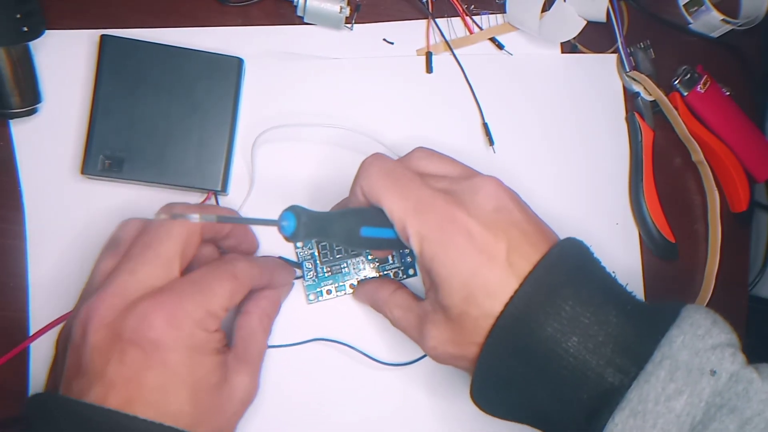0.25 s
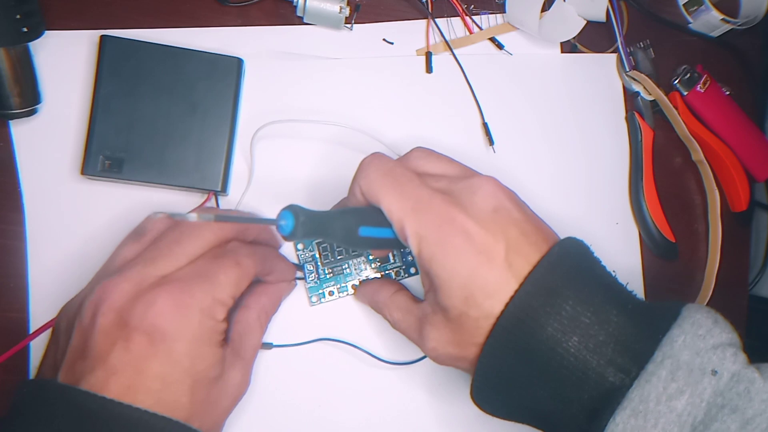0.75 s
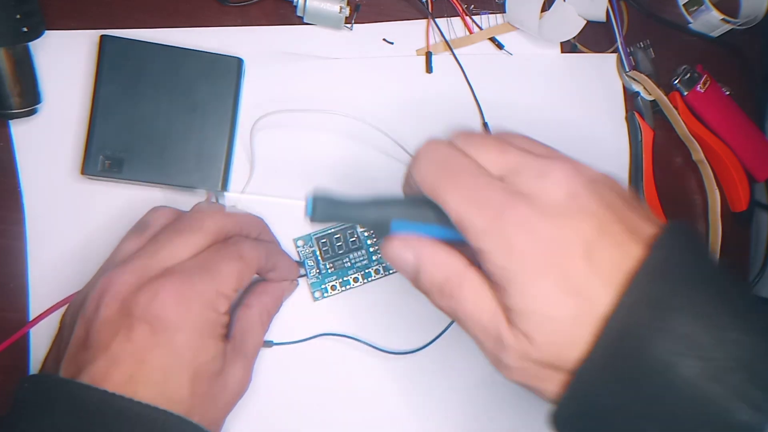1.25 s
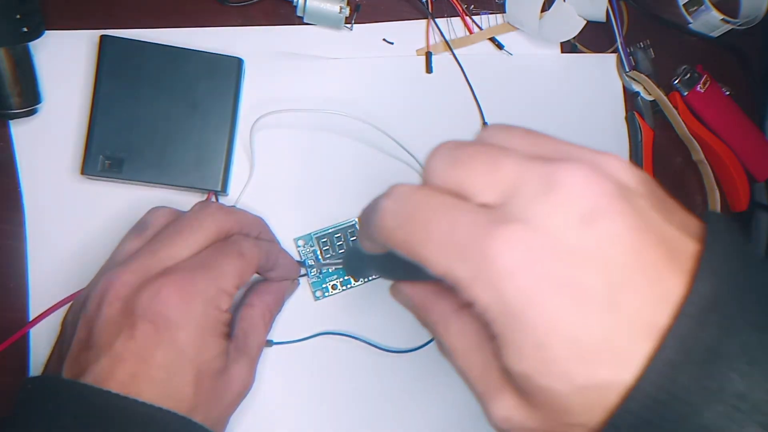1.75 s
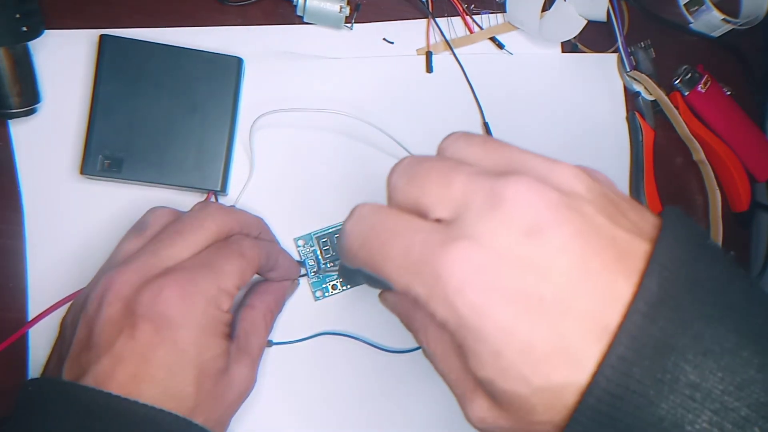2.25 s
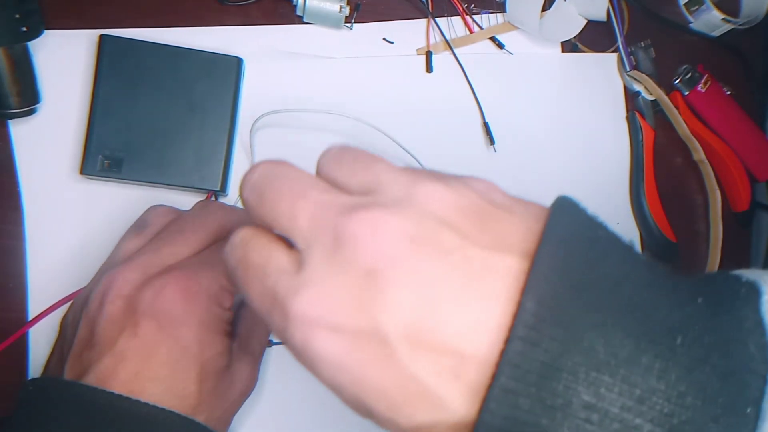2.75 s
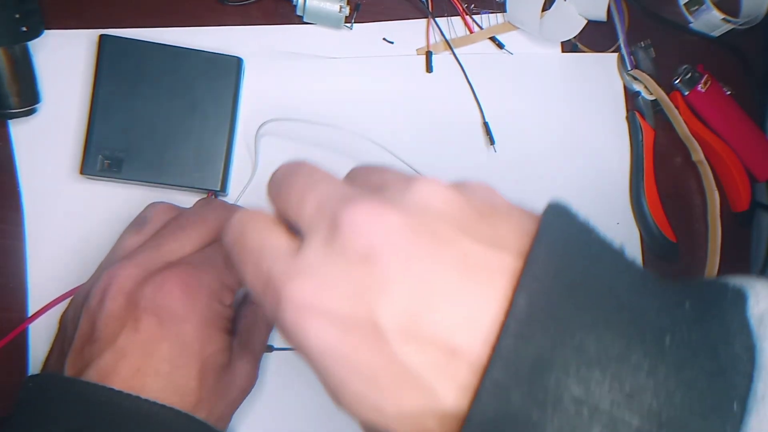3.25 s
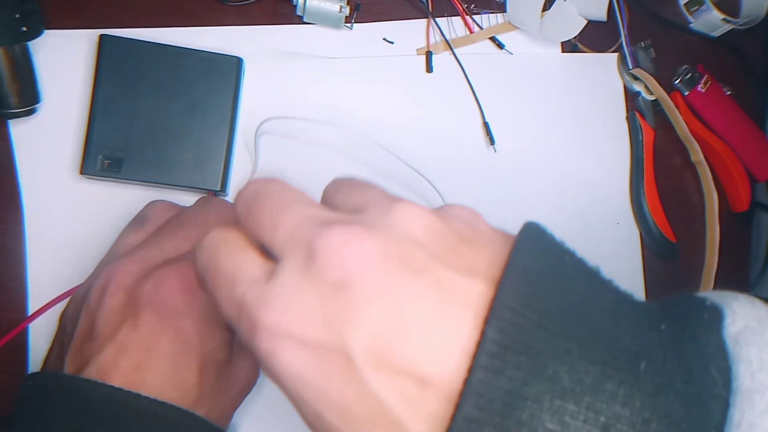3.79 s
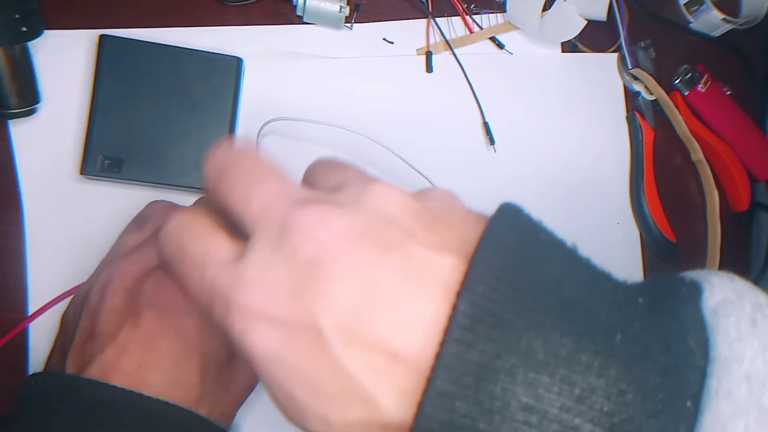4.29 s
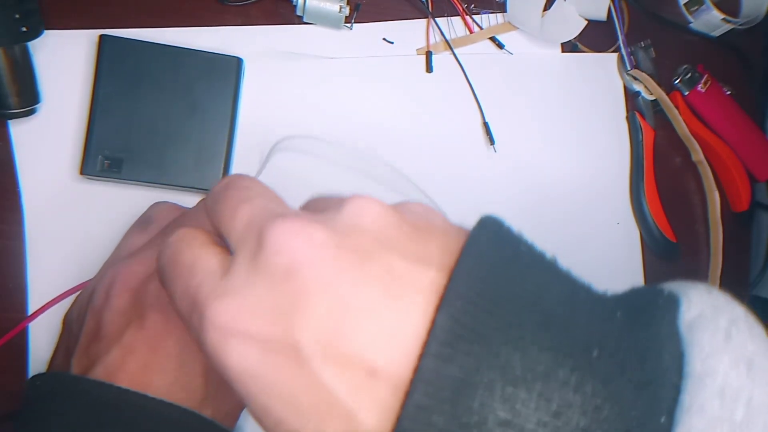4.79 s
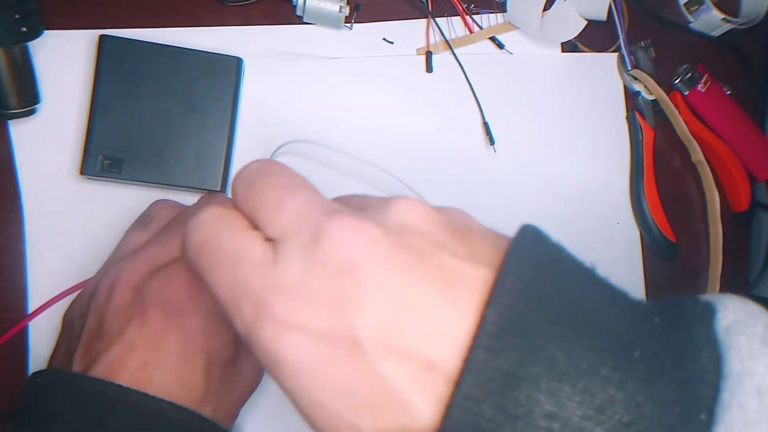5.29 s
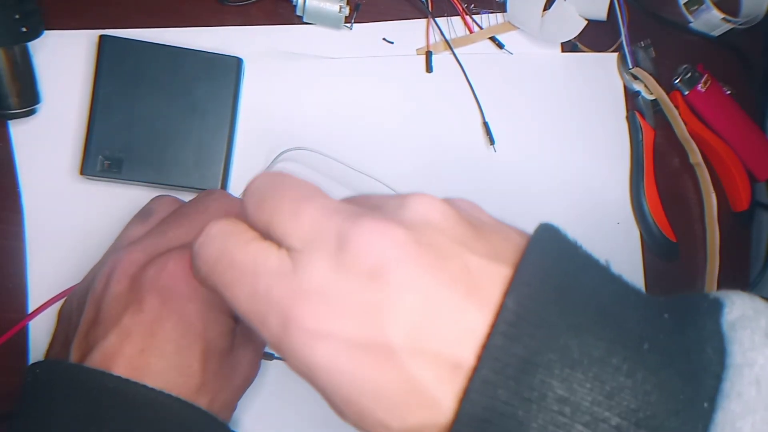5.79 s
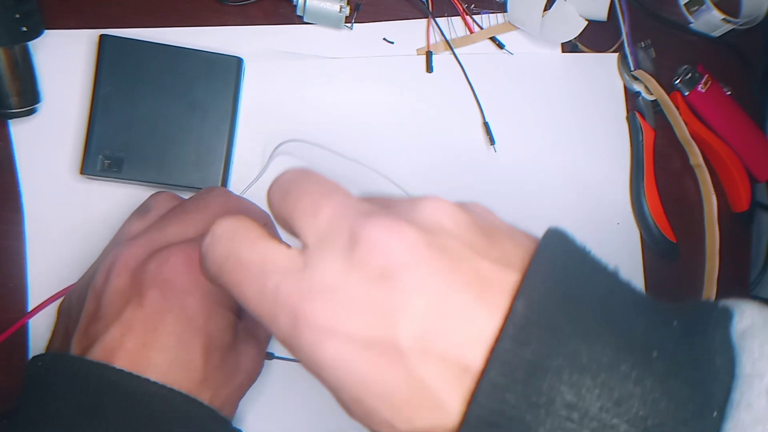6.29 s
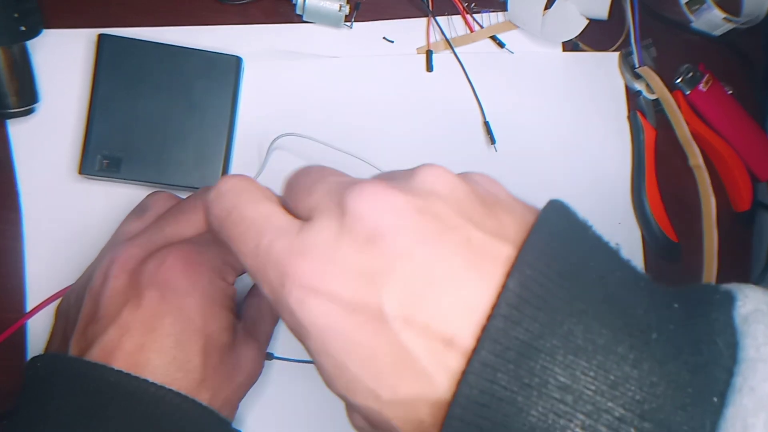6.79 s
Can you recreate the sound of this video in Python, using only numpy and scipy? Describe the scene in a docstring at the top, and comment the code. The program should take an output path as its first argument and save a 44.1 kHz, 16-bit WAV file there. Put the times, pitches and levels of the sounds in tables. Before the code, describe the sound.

Sparse light ticks and scrapes of a screwdriver on screw terminals, with a few sharper knocks on the desk and a faint fan hum.

```python
"""Screwdriver on a circuit board

A small screwdriver works the screw terminals of a little board lying on paper on a desk. The blade
ticks and scrapes, and when it slips the board knocks on the desk top; a small room answers each contact.
Hands rustle, faint tones flicker, thin whistles come and go, and a fan beats against mains hum."""
import sys
import numpy as np
from scipy import signal
from scipy.fft import rfft, irfft
from scipy.io import wavfile

SR = 44100
rng = np.random.default_rng(int(sys.argv[2]) if len(sys.argv) > 2 else 0)


def to_wav(sig):
    """Store sig (one row per channel, or 1-D mono) as 16-bit WAV at the path in sys.argv[1].

    Samples outside -1..1 are clipped; the rate is SR.
    """
    pcm = np.clip(np.atleast_2d(sig), -1, 1) * 32767
    pcm = np.round(pcm).astype(np.int16)
    wavfile.write(sys.argv[1], SR, pcm.T)  # frames by channels


N = 310464
TIME = np.arange(N) / SR
RING_SAMPLES = int(.2 * SR)


def undb(db):
    """Decibels to gain."""
    return 10 ** (np.asarray(db) / 20)


def level(x, db):
    """Scale to an rms level."""
    return x * undb(db) / np.sqrt(np.mean(x ** 2))


def unit_hit(x):
    """Scale a short sound to the energy of 20 ms at full level."""
    return x * np.sqrt(.02 * SR / np.sum(x ** 2))


def colour(x, curve):
    """Shape a sound with an EQ curve of (Hz, dB) points."""
    hz, db = np.transpose(curve)
    bins_hz = np.maximum(np.fft.rfftfreq(len(x), 1 / SR), 1)
    return irfft(rfft(x) * undb(np.interp(np.log(bins_hz), np.log(hz), db)), len(x))


def wander(rate):
    """A random control that glides to `rate` new values a second, with a spread near 1."""
    points = rng.standard_normal(int(N / SR * rate) + 2)
    return np.interp(TIME * rate, np.arange(len(points)), points)


def add(track, start_s, x):
    """Mix a sound into the track."""
    i = max(int(start_s * SR), 0)
    track[i:i + len(x)] += x[:max(N - i, 0)]


# The colour of the hiss. Each row: frequency in Hz, gain in dB.
HISS_EQ = [(100, -9), (4000, -2), (8000, -16), (11000, -8.5), (15500, -4)]
def microphone_hiss():
    """A faint, steady noise floor."""
    return level(colour(rng.standard_normal(N), HISS_EQ), -76.5)


# Tones of the fan blades and the mains. Each row: frequency in Hz, relative level in dB.
HUM_TONES = [(120, -92), (185.5, -86), (240, -80), (360, -65.5), (371, -60), (480, -84)]
# The colour of the air the fan moves. Each row: frequency in Hz, gain in dB.
AIR_EQ = [(60, -30.5), (120, -25.5), (175, -22.5), (250, -9), (325, 1.5), (380, -0.5), (420, -0.5),
          (470, -3), (505, -18), (550, -12), (680, -24.5), (1150, -23), (3000, -37.5), (7000, -44.5)]
def fan(tone_db=-1, air_db=-65, waver_db=1.06, swirl_db=3.5, flutter_db=2.5):
    """The blade tone beats with a mains harmonic 11 Hz below it, over a soft rush of air."""
    tones = np.zeros(N)
    for hz, db in HUM_TONES:
        phase = 2 * np.pi * (hz * TIME + rng.random()) + .25 * wander(3)
        gain = undb(db + waver_db * wander(1.9) + flutter_db * wander(24))
        tones += np.sqrt(2) * gain * np.sin(phase)
    air = level(colour(rng.standard_normal(N), AIR_EQ), air_db) * undb(swirl_db * wander(5))
    return undb(tone_db) * tones + air


# Echoes off near surfaces. Each row: delay in seconds, gain in dB.
EARLY_ECHOES = [(.0029, -18), (.0076, -18), (0.0127, -20.5)]
# The room's tail. Each row: band centre in Hz, relative level in dB, seconds to fall 60 dB.
TAIL_BANDS = [(125, -9.5, 0.27), (400, -14.5, 0.37), (900, -16.5, 0.23), (1940, -13, 0.21),
              (5000, -15.5, 0.17), (8000, -13.5, .22), (14000, -19.5, .16)]
def room(x, gap_s=.006, build_s=.016):
    """Add a few near reflections, then a short diffuse tail that loses its treble first."""
    n = SR // 2
    t = np.arange(n) / SR
    hz, db, t60 = np.transpose(TAIL_BANDS)
    log_hz = np.log(np.maximum(np.fft.rfftfreq(n, 1 / SR), 1))
    noise, response = rfft(rng.standard_normal(n)), np.zeros(n)
    for share, band_db, band_t60 in zip(np.eye(len(TAIL_BANDS)), db, t60):
        band = irfft(noise * np.interp(log_hz, np.log(hz), share), n)
        fade = np.clip((t - gap_s) / build_s, 0, 1) * np.exp(-np.log(1000) * t / band_t60)
        response += band * undb(band_db) * fade / np.sqrt(np.sum(fade ** 2))
    for delay, echo_db in EARLY_ECHOES:
        response[int(delay * SR)] += undb(echo_db)
    return x + signal.fftconvolve(x, response)[:N]


# Hands and sleeve shifting on the paper. Each row: time in seconds, relative level in dB.
HAND_MOVES = [(0.0, -71), (0.25, -70), (0.43, -74.5), (2.0, -75), (2.51, -76), (2.78, -71.5), (3.69, -72),
              (4.24, -75.5), (4.61, -75), (5.02, -75), (5.67, -74), (6.27, -67.5), (6.33, -70.5),
              (7.04, -76.5)]
def hand_motion(rest_db=-78.5):
    """How hard the hands are moving, as a fader."""
    gain = undb(np.interp(TIME, *np.transpose(HAND_MOVES)))
    return np.sqrt(np.maximum(gain ** 2 - undb(rest_db) ** 2, 0))


def rustle(gain_db=-2.5, flutter_db=2.5, grain_db=3):
    """Skin and cloth brush the paper in uneven, grainy strokes."""
    fibres = rng.standard_normal(N) * undb(grain_db * wander(430))
    brush = colour(fibres, [(100, -10), (300, 0.5), (600, 6), (1300, -6.5), (2000, -3.5),
                            (4000, -17.5), (8000, -29), (16000, -34)])
    return level(brush, gain_db) * hand_motion() * undb(flutter_db * wander(44))


def rough_tone(hz, jitter_hz, flutter_db=4):
    """A sine, unsteady in pitch and level."""
    phase = 2 * np.pi * np.cumsum(hz + jitter_hz * wander(300)) / SR
    return np.sqrt(2) * np.sin(phase) * undb(flutter_db * wander(70))


# Faint, thin whistles. Each row: start and length in seconds, pitch in Hz, relative level in dB.
THIN_WHISTLES = [(.08, 0.35, 2075, -69), (3.0, 0.18, 3220, -66.5), (4.14, .18, 3580, -67.5),
                 (6.11, 0.18, 2066, -66), (6.32, 0.33, 1915, -68)]
def whistles(jitter_hz=85, rasp_hz=350, rasp_db=-8, sag_per_s=.08, fade_s=0.078):
    """Whistles near 2 to 3.6 kHz swell and fade, slightly rough and sagging in pitch."""
    out = np.zeros(N)
    for start, length, hz, db in THIN_WHISTLES:
        swell = np.clip(np.minimum(TIME - start, start + length - TIME) / fade_s, 0, 1)
        pitch = hz * (1 - sag_per_s * (TIME - start - length / 2))
        whistle = rough_tone(pitch, jitter_hz) + undb(rasp_db) * rough_tone(pitch, rasp_hz)
        out += undb(db) * swell * whistle
    return out


def ring(modes, weight_db, scatter_db, phase_spread, push_s):
    """Modes rung by a push of finite length; each spot weights them anew."""
    hz, db, t60 = np.transpose(modes)[:, :, None]
    size, phase = rng.standard_normal((2, len(modes), 1))
    t = np.arange(RING_SAMPLES) / SR
    waves = np.sin(2 * np.pi * hz * t + phase_spread * phase) * np.exp(-np.log(1000) * t / t60)
    gains = undb(db + weight_db(hz) + scatter_db * size)
    return np.sum(gains * waves, axis=0) * (1 - np.exp(-t / push_s))


def crack(curve, rise_s, t60):
    """Many dense, heavily damped modes: a burst of coloured noise that builds while the parts meet."""
    t = np.arange(RING_SAMPLES) / SR
    envelope = (1 - np.exp(-(t / rise_s) ** 2)) * np.exp(-np.log(1000) * t / t60)
    return unit_hit(colour(rng.standard_normal(RING_SAMPLES), curve) * envelope)


def snap_level(metal_db, centre_hz, offset_db=-13.5, db_per_octave=15.5):
    """The edge's snap follows the metal's level, and grows the higher the contact rings."""
    return metal_db + offset_db + db_per_octave * np.log2(centre_hz / 3560)


# Modes of the board with its terminal block, and of the metal: blade, screws and clamps.
# Each row: frequency in Hz, relative level in dB, seconds to fall 60 dB.
BOARD_MODES = [(776, -14, .045), (868, 3.5, 0.035), (940, -4, 0.039), (1026, -8, 0.022),
               (1183, -6.5, 0.026), (1392, -10.5, 0.049), (1496, 1, 0.024), (1500, -10, .012),
               (1820, -11, .016), (1884, -2.5, .032)]
METAL_MODES = [(1978, -6.5, 0.047), (2132, -4.5, .02), (2336, 1.5, 0.0078), (2497, 1, 0.016),
               (2870, 1, 0.011), (3197, -4, 0.019), (3524, -0.5, 0.011), (4002, -7, 0.025),
               (4340, -1, 0.014), (4707, 2.5, 0.012), (5190, -1, 0.016), (5640, -2.5, 0.015),
               (5890, -5.5, 0.018), (6550, -11, 0.013)]
# The plastic block's dry clack and the contact's sharp edge. Each row: frequency in Hz, gain in dB.
CLACK_EQ = [(600, -21.5), (1500, 5), (2400, -6), (5200, -10.5), (7500, -21.5), (16000, -28.5)]
SNAP_EQ = [(3000, -26.5), (6000, 2.5), (7800, -1.5), (9000, -10.5), (10300, -0.5), (11200, -5),
           (12300, -4.5), (13800, -4.5), (15500, -1)]
def contact(length_s, board_db, metal_db, centre_hz, snap_db, focus_db, clack_db=-7):
    """Blade meets terminal: the board rings low, the metal around centre_hz, and the edge snaps."""
    def focus(hz):
        return -focus_db * np.log2(hz / centre_hz) ** 2

    def soften(hz):  # a longer, softer contact reaches less far up the board's modes
        return -10 * np.log10(1 + (hz * length_s / 3) ** 4)

    board = ring(BOARD_MODES, soften, scatter_db=.8, phase_spread=.45, push_s=.6 * length_s)
    metal = ring(METAL_MODES, focus, scatter_db=3.0, phase_spread=2.68, push_s=0.25 * length_s)
    clack = crack([(hz, db + focus(hz)) for hz, db in CLACK_EQ], rise_s=1.3 * length_s, t60=0.041)
    snap = crack(SNAP_EQ, rise_s=0.5 * length_s, t60=0.0098)
    terminal = 0.62 * unit_hit(metal) + undb(clack_db) * clack
    return undb(board_db) * unit_hit(board) + undb(metal_db) * terminal + undb(snap_db) * snap


def flickering_tones(gain_db=-7, flicker_db=6, tilt_db_per_octave=-3.0, jitter_hz=40):
    """Faint narrow tones flicker in and out at random, rising and falling with the rustle."""
    out = np.zeros(N)
    for hz, db, _ in BOARD_MODES + METAL_MODES:
        gain = undb(db / 2 + tilt_db_per_octave * np.log2(hz / 1000) + flicker_db * wander(9))
        out += gain * rough_tone(hz, jitter_hz)
    return level(out, gain_db) * hand_motion()


# Blade and wire sliding. Each row: middle and half-length in seconds, level in dB, centre in Hz.
SLIDES = [(0.903, 0.036, -60, 3600), (1.043, 0.088, -60, 3800), (2.814, 0.058, -62, 2400),
          (2.866, 0.1, -63, 2480), (3.233, 0.085, -66.5, 3340), (3.928, 0.063, -67, 2100),
          (3.985, 0.053, -59, 4470), (4.515, 0.16, -69.5, 4060), (4.763, 0.062, -60, 3600),
          (4.89, 0.057, -60, 3280), (5.019, 0.044, -62, 2980), (5.379, 0.044, -65, 2880)]
def scrapes(slips_per_s=1500, board_db=-14, focus_db=11, slip_s=0.0019, grit_db=4):
    """Runs of tiny uneven slips, swelling and fading, ring the same parts as a tap."""
    out = np.zeros(N)
    for middle, half_length, db, centre_hz in SLIDES:
        n = int(2 * half_length * SR)
        sizes = rng.standard_normal(SR) * undb(grit_db * rng.standard_normal(SR))
        slipping = rng.random(SR) < slips_per_s / SR
        slips = (slipping * sizes)[:n] * np.hanning(n) ** 2
        snap_db = snap_level(0, centre_hz, offset_db=-11)
        scrape = signal.fftconvolve(slips, contact(slip_s, board_db, 0, centre_hz, snap_db, focus_db))
        add(out, middle - half_length, undb(db) * scrape * np.sqrt(n / 4 / np.sum(scrape ** 2)))
    return out


# Light touches of blade and wire ends.
# Each row: start and contact length in seconds, relative level in dB, metal centre in Hz.
TOUCHES = [(.888, 0.018, -60.5, 2940), (1.056, 0.0049, -52.5, 3440), (1.064, 0.0049, -55.5, 3200),
           (1.127, .015, -63, 2290), (3.747, 0.006, -63.5, 4170), (3.956, 0.0074, -61, 5030),
           (4.0885, 0.005, -64.5, 4160), (4.391, 0.014, -59.5, 1750), (4.572, 0.0043, -56, 3600),
           (4.5809, 0.0017, -44, 3100), (4.590, 0.0049, -53, 4500), (4.604, 0.0018, -51.5, 1790),
           (4.634, 0.0034, -54, 4850), (6.956, 0.012, -61.5, 2640)]
# Stretches where the fingers fiddle. Each row: start and end in seconds.
FIDDLE_SPANS = [(.45, .7), (3.8, 4.56), (5.1, 5.3)]
def ticks(focus_db=13, board_db=-24.5, faint_per_s=5, faint_db=-70, faint_hz=3700, faint_s=.012):
    """Touches too light to move the desk: a few clear ones, and faint ones at random."""
    out, touches = np.zeros(N), list(TOUCHES)
    for start, end in FIDDLE_SPANS:
        count = int(round(faint_per_s * (end - start)))
        for when, softness, pitch in rng.uniform(-1.1, 1, (count, 3)):
            onset = start + (end - start) * (when + 1) / 2
            touches.append((onset, faint_s, faint_db - 5 * softness, faint_hz * 2 ** (pitch / 2)))
    for start, length, db, centre_hz in touches:
        tick = contact(length, db + board_db, db, centre_hz, snap_level(db, centre_hz), focus_db)
        add(out, start, tick)
    return out


# The screwdriver being taken up. Each row: start and contact length in seconds, relative level in dB.
SHAFT_HITS = [(1.279, 0.012, -62.5), (1.3052, 0.0006, -39), (1.311, 0.0027, -43.5)]
# The shaft's free ring. Each row: frequency in Hz, relative level in dB, seconds to fall 60 dB.
SHAFT_MODES = [(2460, -3, 0.069), (4430, -9, .14)]
def clinks(shaft_db=-15):
    """The smooth shaft grazes, strikes and bounces, with hardly any snap, and rings on briefly."""
    out = np.zeros(N)
    for start, length, db in SHAFT_HITS:
        shaft = ring(SHAFT_MODES, np.zeros_like, scatter_db=3.0, phase_spread=2.5, push_s=length)
        strike = contact(length, board_db=-25, metal_db=0, centre_hz=3200,
                         snap_db=-40, focus_db=19, clack_db=-11)
        add(out, start, undb(db) * (strike + undb(shaft_db) * unit_hit(shaft)))
    return out


# Contacts that reach the desk. Each row: start and contact length in seconds,
# relative levels of desk, board and metal in dB, metal centre in Hz.
DESK_HITS = [(2.2398, 0.0085, -41.5, -56.5, -43.5, 4140), (2.265, 0.0039, -44.5, -60, -64, 3000),
             (2.6582, 0.003, -50, -57.5, -47, 1650), (2.811, 0.0052, -53, -67, -82, 2400),
             (2.974, 0.0079, -52.5, -80, -74, 4500), (3.191, 0.033, -63, -59.5, -67.5, 2570),
             (3.213, 0.013, -45, -55.5, -56.5, 4200), (3.565, 0.026, -56, -36, -44.5, 4520),
             (3.568, 0.0013, -25, -38, -35.5, 3320), (3.62, 0.0036, -50, -51.5, -59.5, 2500),
             (3.64, 0.024, -64, -56, -54, 2210), (4.239, 0.0074, -48, -63.5, -71, 1620),
             (4.999, 0.027, -66.5, -60.5, -88, 2800), (5.863, .0088, -75, -55.5, -81, 1700),
             (5.915, 0.0057, -52.5, -50.5, -71, 1700), (6.2706, 0.0017, -19.5, -17.5, -26.5, 3900),
             (6.6791, 0.0036, -24, -24, -34.5, 3100)]
# The desk top's modes. Each row: frequency in Hz, relative level in dB, seconds to fall 60 dB.
DESK_MODES = [(143, -25.5, 0.2), (195, -24.5, 0.097), (254.5, -16, 0.11), (327.3, -5.5, 0.11),
              (407, 0, 0.055), (456.6, 6, 0.071), (525, 2.5, 0.061), (668, -5.5, 0.059)]
def knocks(focus_db=4, tilt_share=0.11, pivot_hz=490):
    """The board is pushed on to the desk, whose top thuds under the click."""
    out = np.zeros(N)
    for start, length, desk_db, board_db, metal_db, centre_hz in DESK_HITS:
        # a blow square on the board is bright in the desk too; a glancing push gives a dull thud
        bright_db = np.clip(8.5 + 1.7 * (board_db - desk_db), -26, 10)

        def brighten(hz):
            octaves = np.log2(hz / pivot_hz)
            return bright_db / 2 * np.tanh(5 * octaves) + tilt_share * max(bright_db, 0) * octaves

        # the spot hardly changes, so the modes scatter little
        thud = ring(DESK_MODES, brighten, scatter_db=.6, phase_spread=.15, push_s=.8 * length)
        click = contact(length, board_db, metal_db, centre_hz, snap_level(metal_db, centre_hz), focus_db)
        add(out, start, undb(desk_db) * unit_hit(thud) + click)
    return out


def scene():
    """The mono mix: tool work and whistles in the room, over dry tones, rustle, fan and hiss."""
    work = undb(-0.5) * knocks() + undb(-2.0) * (ticks() + clinks()) + scrapes()
    whistling = undb(-5.5) * whistles()
    hiss = microphone_hiss()
    return (room(work + whistling) + flickering_tones() + rustle() + fan() + hiss)[None]


def record(dry):
    """The microphone rounds the hardest peaks and sheds the deep bass; the top is cut."""
    rounded = .7 * np.tanh(dry / .7)
    low_cut = signal.ellip(4, .3, 30, 108, "highpass", fs=SR, output="sos")
    high_cut = signal.ellip(10, .2, 70, 15900, fs=SR, output="sos")
    return signal.sosfilt(high_cut, signal.sosfilt(low_cut, rounded))


dry = scene()
out = record(dry)
to_wav(out)
```